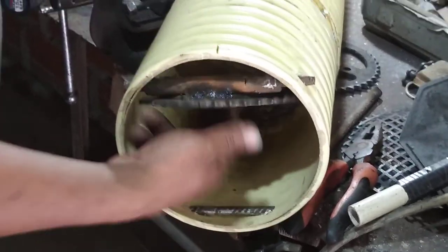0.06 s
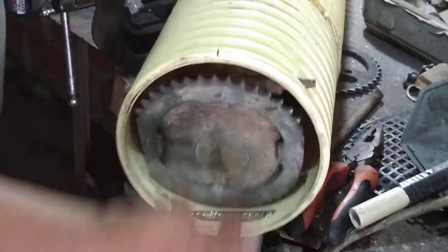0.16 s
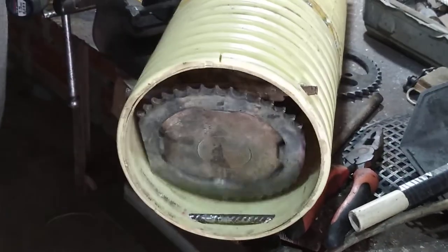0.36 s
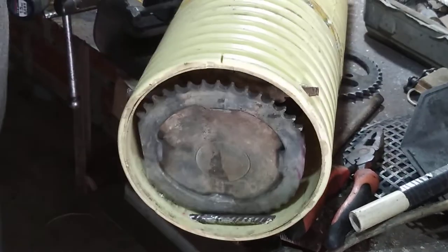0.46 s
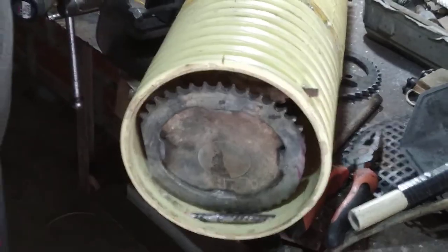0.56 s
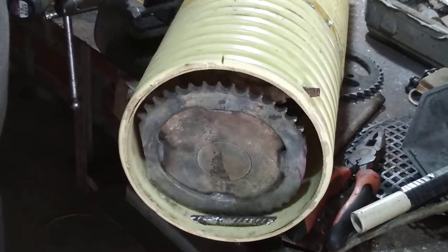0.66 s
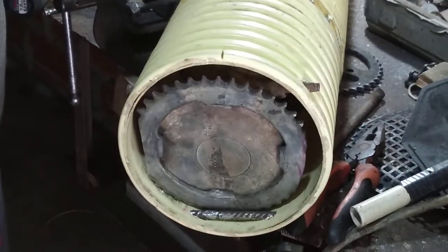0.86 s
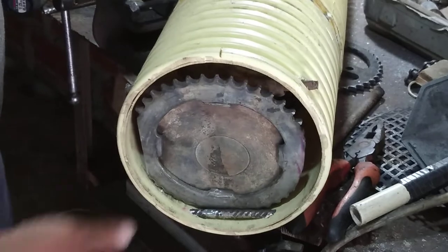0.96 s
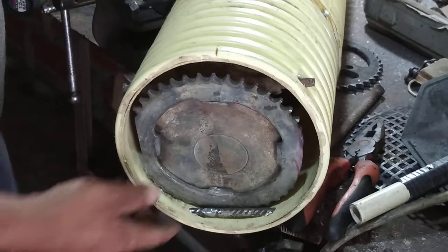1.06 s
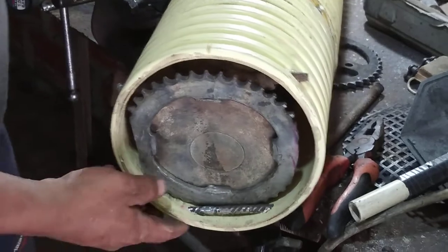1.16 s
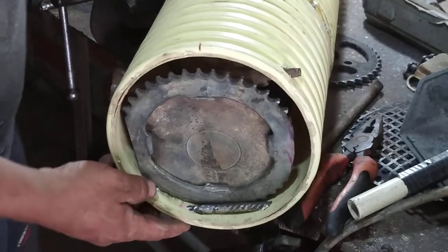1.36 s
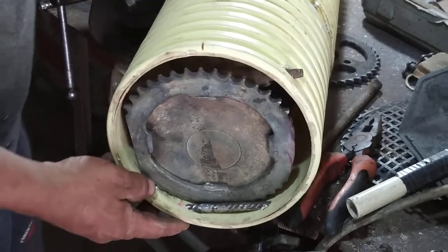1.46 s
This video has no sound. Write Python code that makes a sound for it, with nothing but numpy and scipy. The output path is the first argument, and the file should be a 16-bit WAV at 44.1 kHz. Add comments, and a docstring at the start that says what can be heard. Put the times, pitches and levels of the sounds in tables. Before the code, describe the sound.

A heavy steel flap slams inside a plastic pipe, close up in a cluttered workshop. Faint dull hand scraping and a tiny graze at 0.19 s precede the loud, bright clank at 0.25 s, with rapid bounces until 0.27 s, brief metallic hum and a diffuse room tail. A lighter clink comes at 0.55 s, a very faint one at 0.84 s. Soft rustling from 1.1 s ends with a quiet tap and low thud at 1.36 s, over faint air and rumble.

```python
"""Steel flap in a ribbed pipe, workshop bench

A heavy toothed steel flap hinged in a plastic pipe grazes its stop, slams and bounces; two rim touches follow.
Damped sines ring the disc and hum on, noise clatters, resonances boom the pipe, a diffuse noise tail answers.
A hand scrapes away before the slam, then rustles back (grainy noise) and taps the pipe (tick and thud).
Workshop air and a deep rumble on the microphone ports lie underneath."""
import sys
import numpy as np
from scipy import signal
from scipy.fft import rfft, irfft, next_fast_len
from scipy.io import wavfile
from scipy.ndimage import map_coordinates

SR = 44100
rng = np.random.default_rng(int(sys.argv[2]) if len(sys.argv) > 2 else 0)


def materialize(psi):
    """Save the field psi as 16-bit PCM at rate SR to the path in sys.argv[1].

    A 1-D psi becomes a single channel; in a 2-D psi each row is a channel.
    """
    bounded = np.clip(np.atleast_2d(psi).T, -1, 1)
    quanta = np.round(bounded * 32767).astype(np.int16)
    wavfile.write(sys.argv[1], SR, quanta)


def volts(x):
    """Linear amplitude factor 10**(x/20) for a level x in dB, scalar or array-like."""
    e = np.asarray(x, float) / 20
    return 10 ** e


N = 66150  # samples, 1.5 s
EVENT_T = np.arange(SR // 2) / SR  # time from a contact or tap [s]

# stereo width of clatter, tick and room: (frequency [Hz], side over mid [dB])
HARD_WIDTH = [(60, -7), (150, -18), (370, -8.5), (910, -2.5), (2240, -0.5), (5530, 0), (13700, 3.5)]
# stereo width of air, rubbing and bench rattle: (frequency [Hz], side over mid [dB])
SOFT_WIDTH = [(60, -16.5), (180, -15), (530, -7.5), (1560, 0), (4620, 0), (13700, -1)]


def unit(x):
    """Scale to rms 1."""
    return x / np.sqrt(np.mean(x ** 2) + 1e-20)


def along(points, hz):
    """Read (frequency [Hz], value) points on a log frequency axis."""
    f, value = np.transpose(points)
    return np.interp(np.log(hz + 1), np.log(f + 1), value)


def filtered(x, response):
    """Multiply the spectrum of x by a complex response of frequency."""
    n = x.shape[-1]
    padded = next_fast_len(n + 8192)
    hz = np.fft.rfftfreq(padded, 1 / SR)
    return irfft(rfft(x, padded) * response(hz), padded)[..., :n]


def widened(pair, width):
    """Left and right from a mid and a side signal."""
    side = filtered(pair[1], lambda hz: volts(along(width, hz)))
    return np.array([pair[0] + side, pair[0] - side])


def noise(spectrum, width, size):
    """Coloured stereo noise of rms 1, partly different left and right."""
    white = rng.standard_normal((2, size))
    coloured = filtered(white, lambda hz: volts(along(spectrum, hz)))
    return unit(widened(coloured, width))


def add(out, start_s, x):
    """Mix x into out from start_s."""
    part = out[:, round(start_s * SR):][:, :x.shape[1]]
    part += x[:, :part.shape[1]]


def rubbing(rows, colour):
    """Friction noise in small uneven grains under a stroke."""
    s, db = np.transpose(rows)
    level_db = np.interp(np.arange(N) / SR, s, db, left=-120, right=-120)
    # random level in dB, a new point every 100 samples
    grains_db = map_coordinates(rng.standard_normal(N // 100 + 4), [np.arange(N) / 100])
    return volts(level_db) * unit(volts(grains_db) * noise(colour, SOFT_WIDTH, size=N))


def scrape():
    """Dull friction of the hand on pipe and flap."""
    # stroke: (time [s], level [dB])
    scrape_level = [(0.0, -54), (0.06, -59.5), (0.084, -73.5), (0.142, -52), (0.18, -55.5)]
    # spectrum shape: (frequency [Hz], density [dB per Hz])
    scrape_colour = [(35, -22), (60, -9), (253, -3), (413, -4), (615, -15), (1090, -9.5), (7210, -35),
                     (12000, -49), (15600, -101), (22000, -120)]
    return rubbing(scrape_level, scrape_colour)


def workshop_air():
    """Steady coloured noise of the place."""
    # spectrum shape: (frequency [Hz], density [dB per Hz])
    air_colour = [(53, -36.5), (90, -2), (214, -7.5), (259, -9.5), (658, -13.5), (830, -14.5), (922, -14.5),
                  (1700, -20.5), (2100, -22), (7980, -28.5), (14100, -39.5)]
    return volts(-64.5) * noise(air_colour, SOFT_WIDTH, size=N)


def rumble():
    """Slow lumps of air and handling on the microphone ports, nearly unrelated left and right."""
    # deep level: (time [s], level [dB])
    rumble_level = [(0, -84), (.2, -66), (.26, -47), (0.322, -60), (.7, -65), (0.949, -68), (1.5, -71)]
    # spectrum shape: (frequency [Hz], density [dB per Hz])
    rumble_colour = [(10, -19), (25, 1.5), (65, -4), (110, -21), (200, -60.5), (400, -120)]
    s, db = np.transpose(rumble_level)
    level_db = np.interp(np.arange(N) / SR, s, db)
    return volts(level_db) * noise(rumble_colour, [(30, -0.82), (100, -1.2)], size=N)


def disc_ring(flat):
    """Steel disc modes: damped sines whose balance depends on a flat slam or a rim touch."""
    # modes: (frequency [Hz], level in a flat slam [dB], level in a rim touch [dB], t60 [s])
    disc_modes = [(656, -21, -14, 0.12), (1130, -10.5, 5, 0.05), (1162, -5, -4.5, 0.051),
                  (1402, -10.5, -14, 0.036), (1574, -24.5, -3, 0.057), (1965, -5, -4, 0.045),
                  (2386, -3.5, -11, .045), (2540, -12.5, -4, 0.029), (2934, -13.5, -14, 0.033),
                  (3970, -12, -5.5, .025), (5320, -21.5, -27, 0.01), (5450, -12.5, -16.5, 0.026),
                  (6050, -15.5, -12.5, 0.012), (6510, -9.5, -14, 0.038), (6920, -12, -5, .03),
                  (8200, -1.5, -19, 0.015), (8336, -1, -12, 0.02), (9420, -12, -3, 0.028),
                  (10570, -23, -3, 0.021), (11120, -18.5, -6, 0.025), (12700, -13, -14.5, .02)]
    hz, flat_db, rim_db, t60 = np.transpose(disc_modes)[:, :, None]
    scatter_db = 2 * rng.standard_normal(hz.shape)  # no two blows excite the modes alike
    mode_db = np.where(flat > .5, flat_db, rim_db) + scatter_db
    build_up = 1 - np.exp(-EVENT_T * hz / 3.4)  # each mode needs a few cycles
    gain = volts(mode_db - 60 * EVENT_T / t60) * build_up
    lag_rad = 0.26 * np.sign(rng.standard_normal(hz.shape))  # opposite phase shifts at the two ports
    phase = 2 * np.pi * hz * EVENT_T
    return np.array([(gain * np.sin(phase + side * lag_rad)).sum(0) for side in (1, -1)])


def teeth_clatter(flat):
    """Dense small modes of teeth and hinge, as decaying noise."""
    # spectrum shape in a flat slam: (frequency [Hz], density [dB per Hz])
    slam_colour = [(180, -31.5), (330, -12), (500, -5), (750, -12), (942, -11), (1160, -1.5), (1530, -11),
                   (2360, -3), (3950, -15.5), (4500, -21.5), (6410, -12.5), (8300, -13), (12800, -26),
                   (14100, -39)]
    # spectrum shape in a rim touch: (frequency [Hz], density [dB per Hz])
    rim_colour = [(200, -13), (400, -11.5), (700, -2), (900, -8), (1150, -5.5), (1700, -0.5), (2300, -5.5),
                  (3600, -11), (4600, -15), (5300, -6.5), (7000, -9.5), (9500, -10.5), (12800, -17),
                  (14100, -40.5)]
    colour, level_db = (slam_colour, 2.5) if flat > .5 else (rim_colour, 1.0)
    t60 = .035  # s
    return volts(level_db - 60 * EVENT_T / t60) * noise(colour, HARD_WIDTH, size=len(EVENT_T))


def hardness(x, treble_db, dull_hz):
    """Contact hardness: a short build-up, a treble tilt and a steep roll-off above dull_hz."""
    def response(hz):
        tilt = volts(along([(2500, 0.0018), (6000, treble_db)], hz))
        return tilt / (1 + (hz / dull_hz) ** 10)
    rise_s = 0.0012
    return filtered(x * (1 - np.exp(-EVENT_T / rise_s)), response)


def pipe_boom():
    """An impulse through the pipe's resonances, scaled to peak 1."""
    # resonances: (centre [Hz], width [Hz], gain [dB])
    pipe_modes = [(130, 40, -10), (190, 49, -3), (310, 100, -5), (480, 50, 2.5), (617, 40, -14)]

    def response(f):
        total = 0
        for k, (centre, width, gain_db) in enumerate(pipe_modes):
            band = 1j * f * width / (centre * centre - f * f + 1j * f * width)
            total = total + (-1) ** k * volts(gain_db) * band  # neighbours in opposite phase
        return total * (1j * f / (150 + 1j * f)) ** 2  # low cut

    impulse = 1.0 * (EVENT_T == 0)
    boom = filtered(impulse, response)
    return boom / np.abs(boom).max()


def free_hum(blow_db, free_s):
    """Slow modes that swell once the disc swings free, wavering until the next contact damps them."""
    # modes: (frequency [Hz], level [dB], t60 [s], swell [s])
    hum_modes = [(393, -6.5, 0.93, 0.038), (690, -8.5, 0.45, .03), (1135, -5, 0.46, .03),
                 (1195, -10.5, 0.47, 0.019), (1460, -12.5, .3, .03), (1570, -7.5, .35, 0.012),
                 (5550, -10, .25, .01), (6560, -10.5, 0.22, .01)]
    hum = 0
    for hz, mode_db, t60, swell_s in hum_modes:
        waver_db = 3.5 * map_coordinates(rng.standard_normal(16), [EVENT_T * 24])  # as the disc swings
        # below 500 Hz the hum needs a hard blow: 0.8 dB lost per dB of blow under -22 dB
        deep_db = (hz < 500) * .8 * min(blow_db + 22, 0)
        level = volts(mode_db + waver_db + deep_db - 60 * EVENT_T / t60)
        swell = 1 - np.exp(-(EVENT_T / swell_s) ** 2)
        hum = hum + level * swell * np.sin(2 * np.pi * hz * EVENT_T)
    damping = np.clip((min(free_s, .48) - EVENT_T) / 0.024 + 1, 0, 1)  # 24 ms fade
    return hum * damping


def flap():
    """Every contact rings the disc, rattles teeth and hinge, knocks the pipe and wakes the room."""
    # contacts: (time [s], level [dB], treble [dB], pipe boom [dB], free hum [dB], left over right [dB],
    # flat slam 1 or rim touch 0, dull above [Hz]); boom and hum are relative to the level
    contacts = [(.187, -36.5, -1, -9, -34, -1, 1, 7600), (.247, -6, 6.5, -13.5, -42.5, -1.5, 1, 13990),
                (0.2528, -11.5, 7.5, -13.5, -33.5, 8, 1, 14190),
                (0.2601, -20, 5, -12.5, -35.5, 3, 1, 12040), (.269, -19.5, 2.5, -11.5, -24, -0.5, 1, 11860),
                (.553, -20.5, 5.5, -19, -21.5, -3, 0, 13120), (0.837, -36, 4, -20.5, -18, -1, 0, 11000)]
    out = np.zeros((2, N))
    stops = [row[0] for row in contacts[1:]] + [N / SR]
    for stop, (s, db, treble_db, boom_db, hum_db, pan_db, flat, dull_hz) in zip(stops, contacts):
        ring = hardness(disc_ring(flat), treble_db, dull_hz)
        clatter = hardness(teeth_clatter(flat), treble_db, dull_hz)
        rest = clatter + volts(boom_db) * pipe_boom()
        hit = volts(db) * (ring + rest) * volts([[pan_db / 2], [-pan_db / 2]])
        add(out, s, hit + volts(db + hum_db) * free_hum(db, stop - s))
        # the ring beams out of the pipe mouth: only its first moments fill the room
        beam_t60 = .022  # s
        beam = .9 * ring * volts(-60 * EVENT_T / beam_t60)
        add(out, s, workshop_answer(volts(db) * (beam + rest)))
    return out


def workshop_answer(x):
    """The cluttered room: a fresh diffuse noise tail in which each frequency dies at its own speed."""
    # decay: (frequency [Hz], t60 [s])
    room_decay = [(100, 0.17), (200, 0.66), (400, 0.18), (700, .32), (1800, 0.3), (5000, 0.3),
                  (13000, 0.24)]
    # colour of the answer: (frequency [Hz], level [dB])
    wall_colour = [(300, 2), (1500, 0.5), (6000, -1.5), (13000, -6.5)]
    delay_s = 0.0037
    hz, t, bins = signal.stft(rng.standard_normal((2, SR * 6 // 10)), SR, nperseg=256)
    decay = volts(-60 * t / along(room_decay, hz)[:, None])
    tail = signal.istft(bins * decay, SR, nperseg=256)[1]
    tail = tail / np.linalg.norm(tail[0])
    tail = np.pad(tail, ((0, 0), (round(delay_s * SR), 0)))
    sent = filtered(x.mean(0), lambda f: volts(along(wall_colour, f)))
    return widened(signal.fftconvolve(sent[None], tail, axes=1), HARD_WIDTH)


def rustle():
    """Sleeve and skin rubbing as the hand comes back."""
    # stroke: (time [s], level [dB])
    rustle_level = [(1.05, -97), (1.094, -98), (1.098, -76.5), (1.236, -59.5), (1.292, -64), (1.356, -59),
                    (1.364, -55.5), (1.39, -59), (1.5, -61.5)]
    # spectrum shape: (frequency [Hz], density [dB per Hz])
    rustle_colour = [(710, -17.5), (1200, -4.5), (1570, -1.5), (1620, -2.5), (2440, 0.5), (3150, -6.5),
                     (3680, -9.5), (5900, -7), (7950, -1.5), (14000, -22)]
    return rubbing(rustle_level, rustle_colour)


def taps():
    """A finger lands on the pipe: a soft tick and a low thud of the whole tube on the bench."""
    # taps: (time [s], tick [dB], thud [dB], thud frequency [Hz], thud t60 [s], thud swell [s])
    finger_taps = [(1.362, -42.5, -44.5, 54.6, 0.32, 0.0087)]
    # tick spectrum shape: (frequency [Hz], density [dB per Hz])
    tick_colour = [(350, -39), (600, -6), (1700, -5.5), (2340, -4), (3400, -7), (3850, -9), (9000, -22),
                   (11700, -46), (19800, -120)]
    # bench rattle spectrum shape: (frequency [Hz], density [dB per Hz])
    bench_colour = [(59, -24), (100, -9), (139, -17), (244, -1), (900, -18), (1170, -58.5), (1980, -120)]
    out, t = np.zeros((2, N)), EVENT_T
    for s, tick_db, thud_db, hz, t60, swell_s in finger_taps:
        tick_level = volts(tick_db - 60 * t / 0.029) * (1 - np.exp(-t / 0.0015))
        tick = tick_level * noise(tick_colour, HARD_WIDTH, size=len(t))
        rattle = volts(thud_db - 13.0 - 60 * t / 0.33) * noise(bench_colour, SOFT_WIDTH, size=len(t))
        overtone = 0.62 * np.sin(2 * np.pi * 1.5 * hz * t)
        thud = volts(thud_db - 60 * t / t60) * (np.sin(2 * np.pi * hz * t) + overtone)
        add(out, s, tick + (thud + rattle) * (1 - np.exp(-(t / swell_s) ** 2)))
    return out


def scene():
    """Hand, flap, rumble and workshop air."""
    hand = scrape() + rustle() + taps()
    return hand + flap() + rumble() + workshop_air()


def low_pass(x):
    """Removes everything above the highest recorded frequency."""
    return signal.sosfilt(signal.butter(12, 14280, fs=SR, output="sos"), x)


def record(dry):
    """Band limit at 14300 Hz, then smooth clipping at full scale."""
    x = filtered(dry, lambda hz: 1 / (1 + (hz / 14300) ** 60))
    x = x / (1 + np.abs(x) ** 8) ** (1 / 8)
    return low_pass(x)


dry = scene()
out = record(dry)
materialize(out)
```